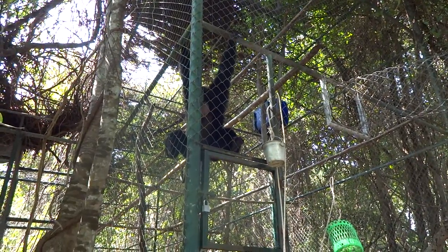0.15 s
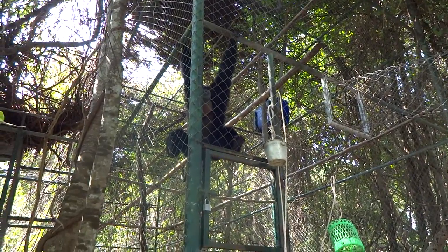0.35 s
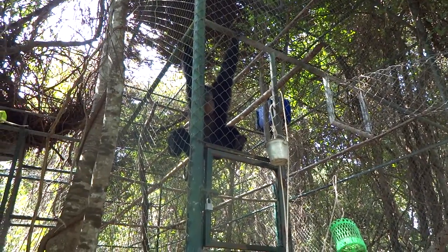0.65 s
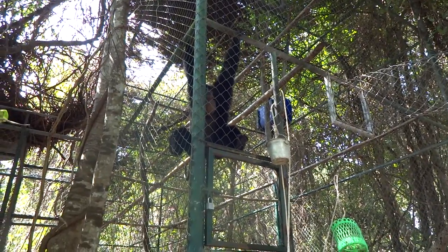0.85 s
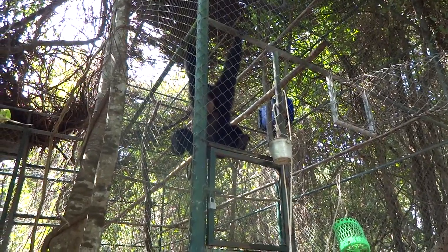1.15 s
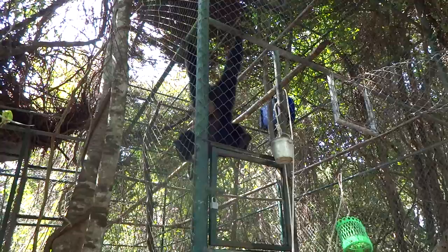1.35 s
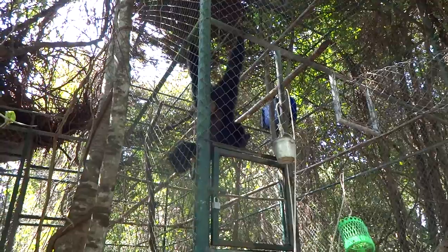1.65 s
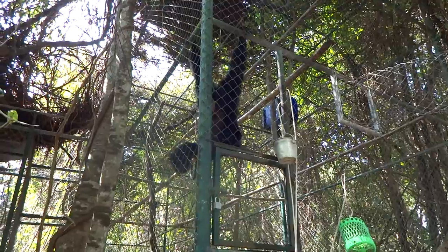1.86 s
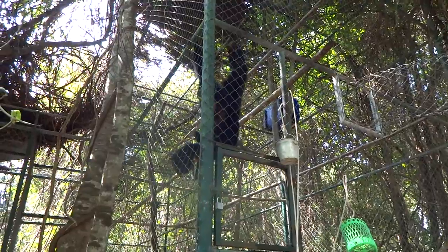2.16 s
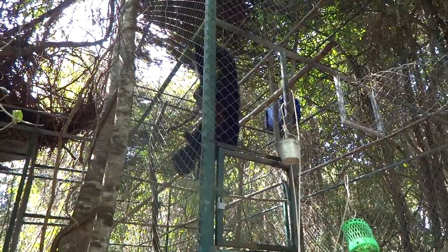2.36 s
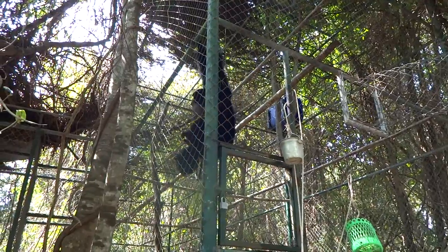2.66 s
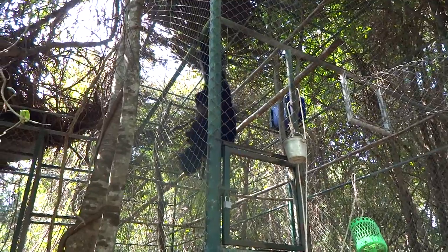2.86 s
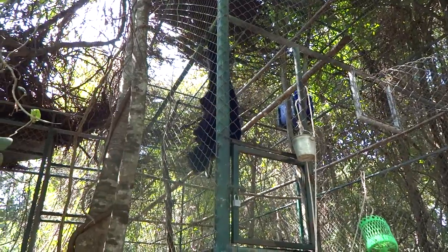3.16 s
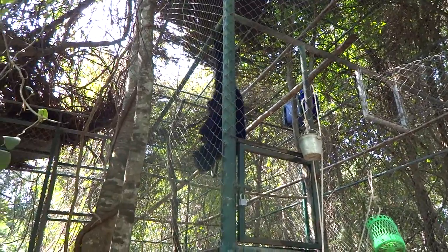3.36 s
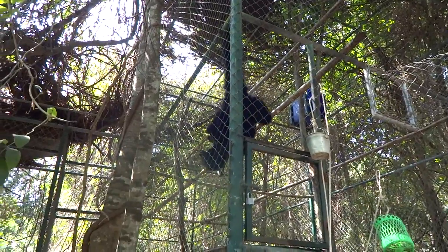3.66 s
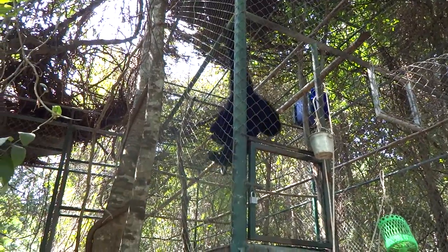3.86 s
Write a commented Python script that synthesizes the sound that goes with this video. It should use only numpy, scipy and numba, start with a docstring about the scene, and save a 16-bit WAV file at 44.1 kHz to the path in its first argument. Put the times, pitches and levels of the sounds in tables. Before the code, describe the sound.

Loud whooping barks and deep booming notes from an ape in a wooded outdoor enclosure.

```python
"""A siamang calls a few metres away in a wooded enclosure. It opens with a loud bark, a harmonic tone that
arches in pitch and turns hoarse as it falls. Its throat sac then resonates in a long, soft, nearly pure
boom under faint whistles. After a second bark, short booms and barks alternate, the mouth squeaking as it
opens, and the ape gradually turns away, so its direct sound loses treble. Throughout, walls echo the
calls, the trees reverberate over still air, and a limiter holds the peaks down."""
import sys
import numpy as np
from scipy import signal
from scipy.fft import rfft, irfft
from scipy.io import wavfile
from scipy.ndimage import uniform_filter1d
from numba import njit

SR = 44100
rng = np.random.default_rng(int(sys.argv[2]) if len(sys.argv) > 2 else 0)


def transcribe(u):
    """Save the signal u as a 16-bit wav file named by the first command-line argument.

    u: samples, shape (n,) or (channels, n), limited to [-1, 1]; the rate is SR.
    q: integer samples, one column per channel.
    """
    v = np.clip(np.atleast_2d(u).T, -1, 1)
    q = np.round(v * 32767).astype(np.int16)
    wavfile.write(sys.argv[1], SR, q)


N = 4 * SR


def undb(db):
    """Amplitude ratio of a level in decibels."""
    return 10 ** (np.asarray(db) / 20)


def along(hz, points):
    """Interpolation of (frequency, value) points on a logarithmic frequency axis."""
    frequencies, values = np.array(points, float).T
    return np.interp(np.log(np.maximum(hz, 1)), np.log(frequencies), values)


def noise(n, spectrum):
    """Spectral shaping: white noise filtered to a given spectrum, at unit power."""
    gain = undb(along(np.fft.rfftfreq(n, 1 / SR), spectrum))
    x = irfft(rfft(rng.standard_normal(n)) * gain, n)
    return x / x.std()


def wobble(n, hz):
    """Random modulation: noise of unit spread, low-passed at hz."""
    x = signal.sosfilt(signal.butter(2, hz, fs=SR, output="sos"), rng.standard_normal(n + SR // 4))
    return x[-n:] / x.std()


def ease(u):
    """Raised-cosine step from 0 to 1."""
    return np.sin(np.pi / 2 * np.clip(u, 0, 1)) ** 2


def add(out, start, x):
    """Superposition: x is added from its start time in seconds."""
    i = max(int(start * SR), 0)
    out[i:i + len(x)] += x[:max(len(out) - i, 0)]


# Response of the throat and mouth. Each row: frequency in Hz, gain of a harmonic there in dB.
VOCAL_TRACT = [(500, -5.5), (735, -2.5), (1080, -2.5), (1300, -4.5), (1480, .5), (1650, -30), (2180, -26),
               (2900, -33.5), (3550, -28.5), (4350, -27), (5000, -33.5), (5800, -35), (6500, -35.5),
               (7300, -41.5), (8600, -52), (11000, -58)]
# Hoarse air in a bark. Each row: frequency in Hz, relative spectral density in dB.
RASP_SPECTRUM = [(400, -30.5), (800, 0), (1800, -1), (2500, 10.5), (3200, 5.5), (6000, -8), (11000, -21.5)]
# Barks. Each row: start and length in seconds, top and end pitch in Hz, share of the length before the
# fall, level in dB, overtone gain in dB, roughness from 0 to 1, extra treble in dB, crack in dB.
BARKS = [(0.088, 0.15, 748.2, 626.8, 0.47, -13, -1.5, 0.24, -3, 9),
         (.973, 0.16, 742, 603, 0.45, -13.5, -0.5, 0.22, 0.5, 2),
         (1.366, 0.1, 725, 516.4, 0.405, -11, 0.5, 0.29, -1, 1),
         (1.636, 0.092, 700, 514, 0.43, -11, -1.5, 0.37, 3.5, -1),
         (1.92, 0.097, 714.4, 515.5, 0.41, -12, -0.5, 0.35, 3.5, 3),
         (2.210, 0.0921, 709.8, 516.3, 0.42, -11, 3.5, 0.45, 2, 0.5),
         (2.52, 0.095, 727.6, 525, 0.41, -11, 3.5, 0.48, -1.5, 5),
         (2.822, .096, 733.3, 526, .39, -10.5, 4, 0.5, -0.5, 3),
         (3.175, 0.099, 735, 529.3, 0.45, -9.5, 5.5, 0.45, -1.5, 0),
         (3.532, 0.10487, 725.6, 538, .37, -8, 5, 0.39, -4, 1),
         (3.897, 0.1, 730, 532.1, 0.37, -8, 4, 0.45, 0, -8)]


def bark(length, top_hz, end_hz, hold, db, overtones_db, rough, bright_db, crack_db):
    """Source and filter: the tract shapes a voice that scoops up, then cracks and roughens as it falls."""
    attack_s, overtone_attack_s, release_s = 0.031, 0.015, 0.0051
    t = np.arange(int((length + release_s) * SR)) / SR
    n = len(t)
    scoop_hz = 124.8 * np.exp(-(t / (0.13 * length)) ** 1.6)
    fall = np.sin(1.3 * np.clip((t / length - hold) / (1 - hold), 0, None) ** 1.45)
    drop_hz = (top_hz - end_hz) * fall
    hz = top_hz - scoop_hz - drop_hz
    hoarse = rough * ease((drop_hz - 24) / 65)  # sets in between 24 and 89 Hz below the top
    flare_db = crack_db * np.exp(-((drop_hz - 89) / 27.5) ** 2)  # the crack, centred 89 Hz down
    jitter = (0.0005 + 0.009 * hoarse) * wobble(n, hz=443)
    phase = 2 * np.pi * np.cumsum(hz * (1 + jitter)) / SR
    overtone_gain = undb(overtones_db - 14 * rough * fall) * ease(t / overtone_attack_s)
    voice = 0
    for k in range(1, 18):
        amplitude = undb(along(k * hz, VOCAL_TRACT))
        if k > 2:
            treble_db = ease((k - 2) / 6) * (bright_db + flare_db)
            waver_db = 3.5 * wobble(n, hz=24.6)
            amplitude *= overtone_gain * undb(treble_db + waver_db)
        shimmer = 1 + 0.35 * hoarse * wobble(n, hz=110)
        voice += amplitude * shimmer * np.sin(k * phase)
    rasp_gain = undb(-22 - 11.5 * rough * fall) * (0.02 + hoarse)
    rasp = rasp_gain * (1 + 0.5 * np.cos(phase)) * noise(n, RASP_SPECTRUM)  # pulses once a cycle
    puff = undb(-50) * (0.5 + hoarse) * wobble(n, hz=110)
    envelope = ease(t / attack_s) ** 0.33 * ease((t[-1] - t) / (2 * release_s))
    return np.sqrt(2) * undb(db - fall) * envelope * (voice + rasp + puff)  # the fall costs 1 dB


# Booms. Each row: start and length in seconds, pitch in Hz, level in dB, share of the length spent
# swelling, slow rise in Hz, final lift in Hz.
BOOMS = [(0.317, 0.54, 258, -18, 0.44, 22, -4.5), (1.196, 0.18, 260.1, -15.5, 0.68, 1, 19),
         (1.533, 0.1149, 262.1, -16.5, 0.598, 14.5, 24.5), (1.839, 0.091, 264.3, -17, 0.62, -6, 30.5),
         (2.115, 0.1, 260, -18.5, 0.622, 17, 18.5), (2.436, 0.0904, 263.6, -19, 0.63, 3, 19.5),
         (2.718, 0.11, 260, -19.5, 0.65, 3, 31), (3.053, 0.1293, 261, -17, 0.669, 6, 30.5),
         (3.387, 0.1531, 254.2, -17, 0.7, 5.5, 28), (3.73, 0.1642, 253.1, -15.5, 0.67, 4.5, 24.5)]
# Spectrum of the sac. Each entry: gain in dB of one harmonic, from the fundamental up.
SAC_HARMONICS_DB = [4, -33.5, -41]


def boom(length, base_hz, db, swell, rise_hz, lift_hz):
    """Resonance: the throat sac swells with an almost pure tone that bends before the mouth opens."""
    run_on_s, run_on_db, breath_db = 0.024, -19.5, -50.5
    t = np.arange(int((length + run_on_s) * SR)) / SR
    progress = t / length
    onset_hz = 65 * np.exp(-t / 0.0082)
    bend_hz = lift_hz / (1 + np.exp((0.824 - progress) / 0.044))
    hz = base_hz + rise_hz * (progress - 0.5) + onset_hz + bend_hz
    phase = 2 * np.pi * np.cumsum(hz) / SR
    envelope = ease(progress / swell) ** 0.572 * ease((1 - progress) / (1 - swell)) ** 0.73
    # A boom that lifts runs on softly under the bark.
    run_on = (lift_hz > 0) * undb(run_on_db) * ease(1 - np.abs(t - length) / run_on_s)
    tone = sum(gain * np.sin(k * phase) for k, gain in enumerate(undb(SAC_HARMONICS_DB), 1))
    breath = undb(breath_db) * wobble(len(t), hz=100)
    return np.sqrt(2) * undb(db) * np.hypot(envelope, run_on) * (tone + breath)


def gulp(length=0.083, db=-49):
    """Flow noise: air rushes softly into the throat sac as a boom begins."""
    n = int(length * SR)
    return undb(db) * np.hanning(n) * noise(n, [(600, -38.5), (980, 2), (1400, -20.5), (6000, -50)])


SQUEAK_S = 0.023
# Squeaks before the barks. Each row: midpoint in seconds, level in dB.
SQUEAKS = [(1.345, -29.5), (1.622, -31), (1.903, -31), (2.191, -31), (2.5, -35), (2.804, -33.5),
           (3.155, -34), (3.502, -35.5)]


def squeak(db, centre_hz=1033.3, sweep_hz_per_s=7000, jitter_hz=90, hiss_db=-10.5):
    """Frequency sweep: a short, airy note rises as the mouth opens."""
    n = int(SQUEAK_S * SR)
    t = np.arange(n) / SR - SQUEAK_S / 2
    hz = centre_hz + sweep_hz_per_s * t + jitter_hz * wobble(n, hz=300)
    tone = np.sqrt(2) * np.sin(2 * np.pi * np.cumsum(hz) / SR)
    hiss = undb(hiss_db) * noise(n, [(3700, -5), (4700, -19), (6000, -1.5), (11000, -33)])
    envelope = np.sin(np.pi * np.sqrt(np.arange(n) / n)) ** 2
    return undb(db) * envelope * (tone + hiss)


# Thin whistles over the booms. Each row: midpoint and length in seconds, pitch in Hz, level in dB.
WHISTLES = [(0.592, 0.133, 1800, -57.5), (0.675, 0.103, 2327, -55.5), (0.81, 0.11, 2287, -63),
            (0.655, 0.096, 3870, -67.5), (0.686, 0.33, 5539, -76.5), (1.333, 0.0764, 2290, -47.5),
            (1.607, 0.063, 2320, -46.5), (1.917, 0.107, 2360, -55)]


def whistle(length, centre_hz, db):
    """Frequency modulation: a faint sine tone sags and wavers a little."""
    n = int(length * SR)
    hz = centre_hz * (1 - 0.017 * np.linspace(-1, 1, n) + 0.002 * wobble(n, hz=60))
    return np.sqrt(2) * undb(db) * np.hanning(n) * np.sin(2 * np.pi * np.cumsum(hz) / SR)


def resonance(x, centre_hz=622, bandwidth_hz=40, db=-4.5, lag_rad=0.965):
    """Interference: the falling voice dips above a narrow resonance, swells on it, beats with its ring."""
    pole = np.exp((2j * centre_hz - bandwidth_hz) * np.pi / SR)
    ring = signal.lfilter([1 - abs(pole)], [1, -pole], x) * np.exp(-1j * lag_rad)
    return x + 2 * undb(db) * ring.real


def direct_path(x, treble_hz=915, bounce_s=0.0115, bounce_db=-12, balance_db=1.32):
    """Directivity: as the ape turns away, treble leaves the straight path and some returns off a wall."""
    t = np.arange(N) / SR
    turned = ease((t - 1.73) / 2.1)  # the turn starts at 1.73 s and takes 2.1 s
    treble = signal.sosfiltfilt(signal.butter(3, treble_hz, "high", fs=SR, output="sos"), x)
    lost = (1 - undb(-8 * turned)) * treble
    bounce = undb(bounce_db) * np.interp(t - bounce_s, t, lost)
    return (x - lost + bounce) * undb([[balance_db / 2], [-balance_db / 2]])


# Reverberation of the trees. Each row: band centre in Hz, level in dB, time to decay 60 dB in seconds.
REVERB_BANDS = [(100, -39.5, .3), (260, -24.5, 1.1), (612, -13.5, 0.66), (713, -7.5, 1.25),
                (1398, -14, 1.01), (2300, -5, 0.99), (4270, -4, 1), (6300, -6.5, 0.9), (11000, -3, 0.49)]
# Echoes from near walls. Each row: delay in seconds, left level in dB, right level in dB.
WALL_ECHOES = [(0.0252, -20.5, -21), (.046, -24, -26)]


def enclosure(x, build_s=0.0081, early_s=0.036):
    """Reflection and scattering: two walls echo, and the trees return a dense, decaying tail."""
    t = np.arange(SR) / SR
    hz = np.fft.rfftfreq(SR, 1 / SR)
    mid, side = rfft(rng.standard_normal((2, SR)))
    width = along(hz, [(1000, 0.2), (3000, 0.39)])  # wider in the treble
    scatter = mid + np.array([[1], [-1]]) * width * side
    onset = ease(t / build_s) * (1 + 4.28 * np.exp(-t / early_s))  # early scatter is strongest
    response = np.zeros((2, SR))
    for centre, db, t60 in REVERB_BANDS:
        band = along(hz, [(row[0], row[0] == centre) for row in REVERB_BANDS])
        decay = onset * np.exp(-np.log(1000) * t / t60)
        response += undb(db) * irfft(scatter * band, SR) * decay / np.linalg.norm(decay)
    for delay, left_db, right_db in WALL_ECHOES:
        response[:, int(delay * SR)] += undb([left_db, right_db])
    return signal.fftconvolve(x[None], response, axes=1)[:, :N]


# Still air among the trees. Each row: frequency in Hz, relative spectral density in dB.
AIR_SPECTRUM = [(30, -17.5), (75, -6), (400, -7.5), (1400, -15.5), (2000, -28.5), (11000, -43.5)]


def still_air(db=-61):
    """Partial coherence: a low hush common to both channels, plus a little independent noise in each."""
    common = noise(N, AIR_SPECTRUM)
    independent = np.array([noise(N, AIR_SPECTRUM), noise(N, AIR_SPECTRUM)])
    return undb(db) * (common + 0.25 * independent)


def scene():
    """Multipath propagation: one ape's calls arrive directly and by reflection, over still air."""
    ape = np.zeros(N)
    for start, *row in BARKS:
        add(ape, start, bark(*row))
    for start, *row in BOOMS:
        add(ape, start, boom(*row))
        add(ape, start, gulp())
    for middle, db in SQUEAKS:
        add(ape, middle - SQUEAK_S / 2, squeak(db))
    for middle, length, hz, db in WHISTLES:
        add(ape, middle - length / 2, whistle(length, hz, db))
    ape = resonance(ape)
    return direct_path(ape) + enclosure(ape) + still_air()


@njit
def follow_peaks(x, release):
    """Envelope detection: instant rise, exponential fall."""
    envelope, peak = np.empty(len(x)), 0.
    for i in range(len(x)):
        peak = max(x[i], peak * release)
        envelope[i] = peak
    return envelope


def record(dry, threshold_db=-3, ratio=10, release_s=0.06, cutoff_hz=11100):
    """Limiting: the gain falls on peaks above a threshold; a steep low-pass then cuts the top."""
    peak = follow_peaks(np.abs(dry).max(axis=0), np.exp(-1 / (release_s * SR)))
    gain = np.maximum(peak / undb(threshold_db), 1) ** (1 / ratio - 1)
    limited = dry * uniform_filter1d(gain, size=128)
    return signal.sosfilt(signal.ellip(10, 0.2, 80, cutoff_hz, fs=SR, output="sos"), limited)


dry = scene()
out = record(dry)
transcribe(out)
```